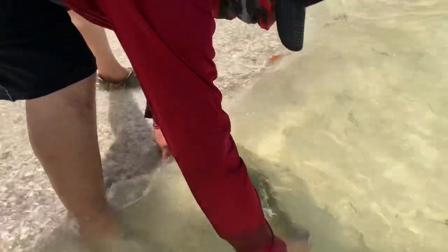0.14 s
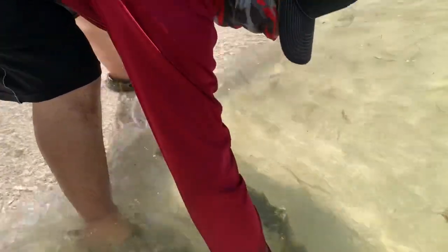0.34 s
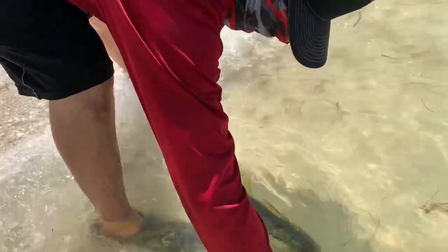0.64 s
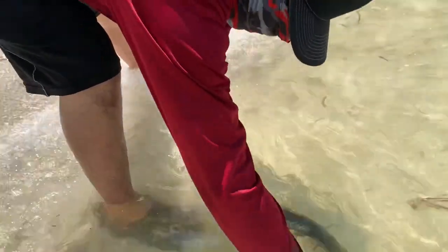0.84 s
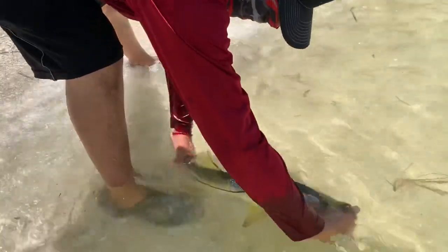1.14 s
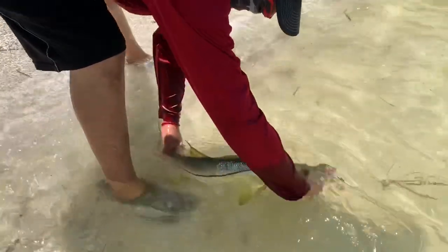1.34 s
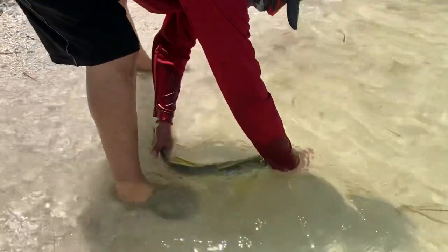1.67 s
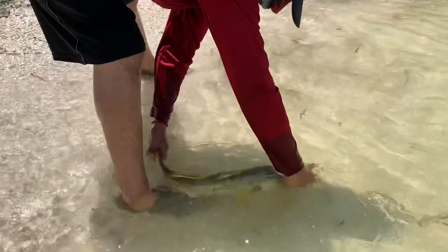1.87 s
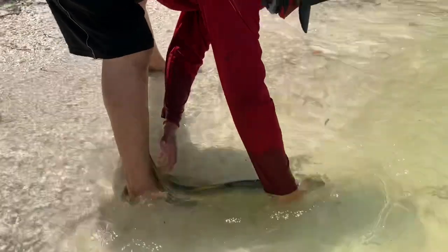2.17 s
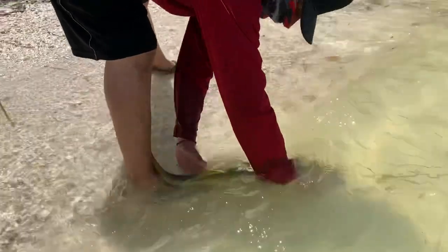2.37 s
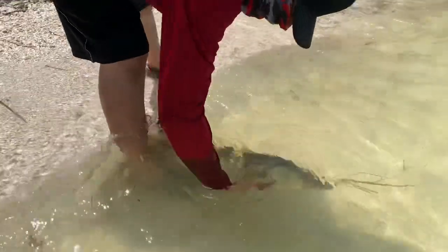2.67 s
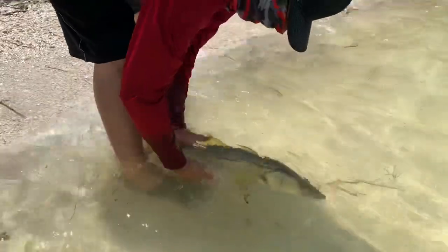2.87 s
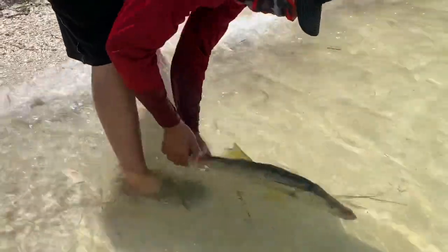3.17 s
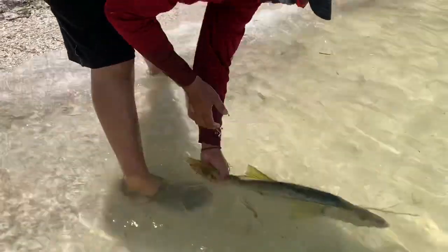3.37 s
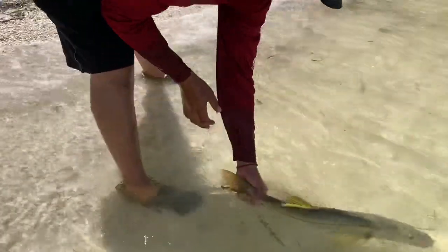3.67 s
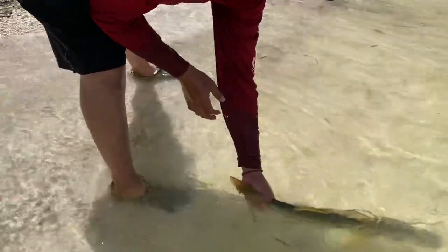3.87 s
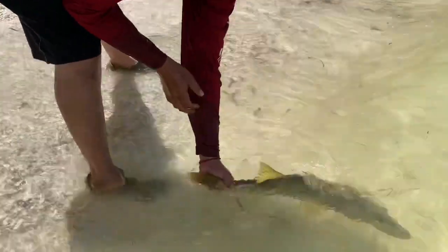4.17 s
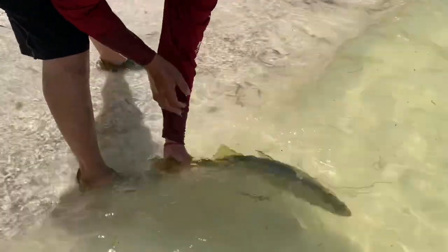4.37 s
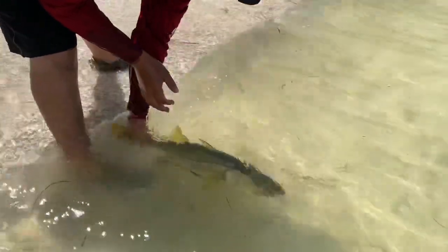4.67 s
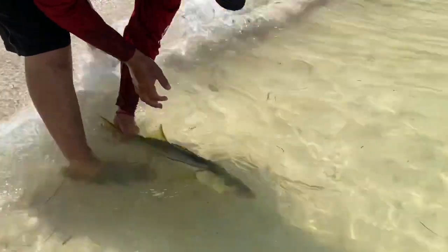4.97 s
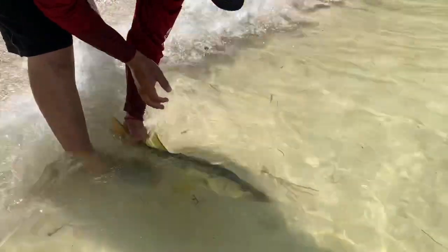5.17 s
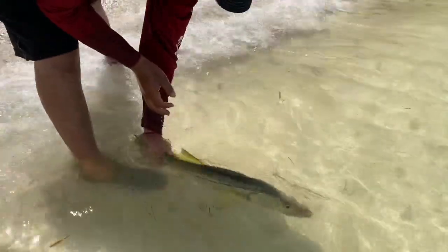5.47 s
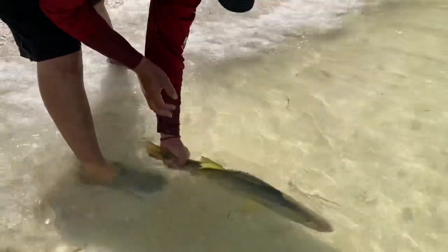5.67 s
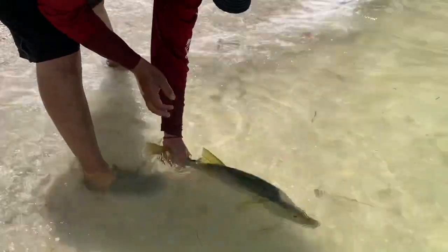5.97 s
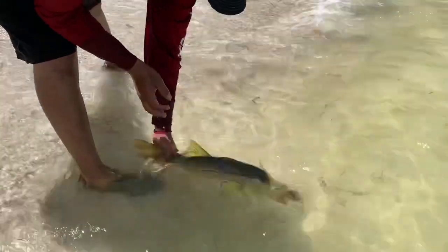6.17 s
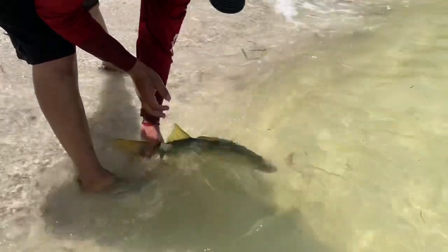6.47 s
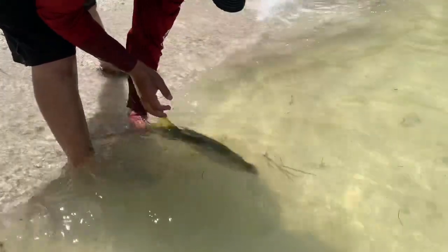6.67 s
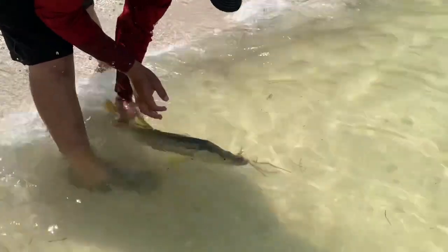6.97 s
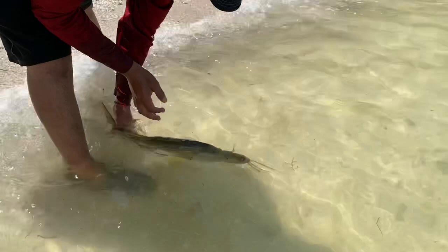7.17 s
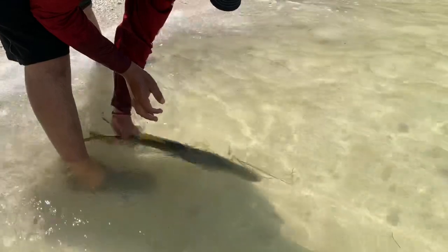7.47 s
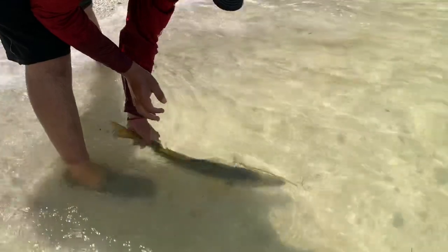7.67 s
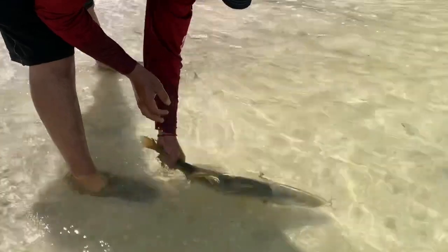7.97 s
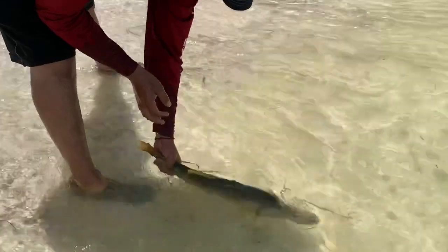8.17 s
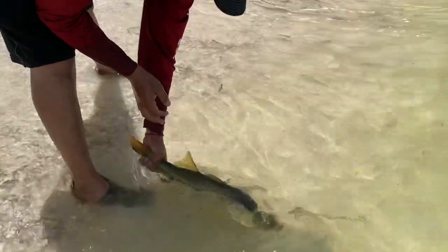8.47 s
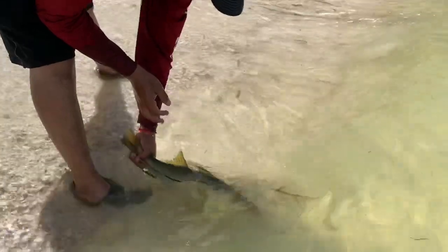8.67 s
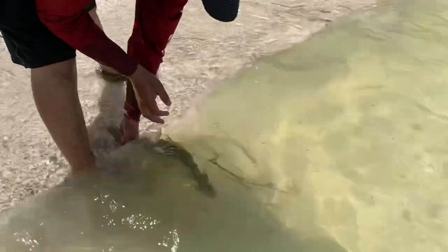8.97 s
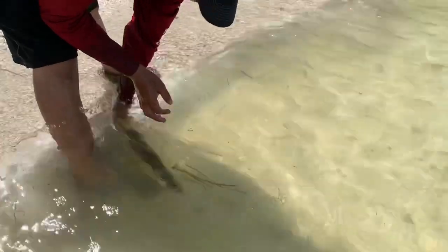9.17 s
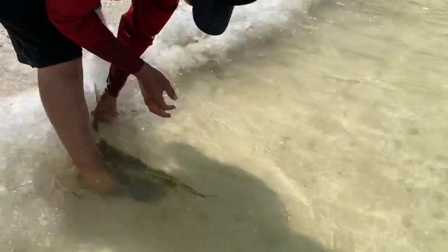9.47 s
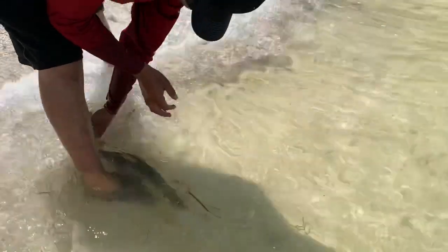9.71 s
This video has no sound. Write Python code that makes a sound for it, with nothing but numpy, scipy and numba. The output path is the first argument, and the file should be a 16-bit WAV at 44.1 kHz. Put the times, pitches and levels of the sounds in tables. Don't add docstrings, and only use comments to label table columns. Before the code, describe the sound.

Outdoors at a sandy beach, a hand-held phone picks up small waves breaking mostly on the left, their foam hissing and fizzing, with smooth distant surf behind. Water slops, slaps and trickles around feet and a fish held in the shallows. Wind gusts thud and rumble on the microphone over a low wavering hum. Washes come and go, strongest near five seconds and after nine.

```python
import sys
import numpy as np
from scipy import signal
from scipy.fft import rfft, irfft
from scipy.io import wavfile
from scipy.ndimage import uniform_filter1d
from numba import njit

SR = 44100
rng = np.random.default_rng(int(sys.argv[2]) if len(sys.argv) > 2 else 0)


def int16_out(signal):
    q = np.round(np.clip(np.atleast_2d(signal).T, -1, 1) * 32767)
    wavfile.write(sys.argv[1], SR, q.astype(np.int16))


def ratio_of_db(decibels):
    return 10 ** (np.asarray(decibels, float) / 20)


N = 433944
TIME = np.arange(N) / SR
FREQ = np.fft.rfftfreq(N, 1 / SR)
COARSE = np.arange(0, N / SR + .01, .01)


@njit
def grains(start, hz, cycles, size, glide):
    out = np.zeros(N)
    for k in range(len(start)):
        tau = cycles[k] * SR / hz[k] / 4
        i0 = int(start[k] * SR)
        phase = 0.
        for i in range(min(int(8 * tau) + 2, N - i0)):
            phase += 2 * np.pi * hz[k] * (1 + glide * i / (4 * tau)) / SR
            out[i0 + i] += size[k] * i / tau * np.exp(1 - i / tau) * np.sin(phase)
    return out


def events(table, cycles, trim_db, glide):
    s, db, hz = np.transpose(table)
    return grains(s, hz, np.full(len(s), cycles), ratio_of_db(db + trim_db), glide)


def trickles(rills):
    s, length, hz, db = np.transpose(rills)[:, :, None]
    when, pitch, big = np.moveaxis(rng.random((len(rills), 150, 3)), 2, 0)
    start = s + length * when
    hz = hz * (1 + 0.14 * (2 * pitch - 1))
    cycles = 13 * (.5 + big)
    return grains(start.ravel(), hz.ravel(), cycles.ravel(), ratio_of_db(db - 18 * big).ravel(), 0.032)


def walk(rate_hz):
    k = int(SR / rate_hz)
    held = np.repeat(rng.standard_normal(N // k + 1), k)
    return 0.867 * uniform_filter1d(uniform_filter1d(held, k), k)[:N]


def foam(count, lo_hz, hi_hz, cycles, spread_db, share):
    when, pitch, big = rng.random((count, 3)).T
    hz = lo_hz * (hi_hz / lo_hz) ** pitch
    size = ratio_of_db(-spread_db * np.log(1.03 - big))
    pops = rfft(grains(when * N / SR, hz, cycles * (.5 + big), size, 0.2063))
    power = uniform_filter1d(np.abs(pops) ** 2, size=8000)
    pops = pops / np.sqrt(power + 1e-9) * np.sqrt(N)
    hiss = rfft(rng.standard_normal(N))
    inside = share * (FREQ > lo_hz) * (FREQ < hi_hz)
    return np.sqrt(inside) * pops + np.sqrt(1 - inside) * hiss


def lag(turns):
    return np.exp(1j * np.pi * turns * np.array([[1], [-1]]))


def ports(shared, turns, likeness):
    alone = rfft(np.array([np.roll(irfft(shared, N), k * N // 3) for k in (1, 2)]))
    return np.sqrt(likeness) * shared * lag(turns) + np.sqrt(1 - likeness) * alone


def surges(table, rise_db_s, fall_db_s, calm_db):
    start, hold, db, *weaker = np.transpose(table)[:, :, None]
    early = np.maximum(start - COARSE, 0)
    late = np.maximum(COARSE - start - hold, 0)
    levels = []
    for k, (fall, calm) in enumerate(zip(fall_db_s, calm_db)):
        each = db - k * sum(weaker) - rise_db_s * early - fall * late
        levels.append(10 * np.log10(ratio_of_db(2 * calm) + np.sum(ratio_of_db(2 * each), axis=0)))
    return levels


def swelling(pair, colour, table, bands_hz, swell_db, flicker_db, flicker_rate, step):
    hz, db = np.transpose(colour)
    octave = np.log2(np.maximum(FREQ, 1))
    pair = pair * ratio_of_db(np.interp(octave, np.log2(hz), db, -200)) * np.sqrt(SR / 2)
    s, *levels = np.transpose(table)
    levels = np.array([c - 10 * np.log10(np.mean(ratio_of_db(2 * c))) for c in levels])
    swell = walk(flicker_rate)
    out = 0
    for centre in np.arange(np.floor(np.log2(hz[0])), np.log2(min(hz[-1], 20000)) + step, step):
        band = irfft(pair * np.clip(1 - np.abs(octave - centre) / step, 0, 1), N)
        weights = [np.interp(centre, np.log2(bands_hz), one) for one in np.eye(len(bands_hz))]
        curve = np.interp(TIME, s, levels.T @ weights)
        out = out + band * ratio_of_db(curve + swell_db * swell + flicker_db * walk(flicker_rate))
    return out


# frequency in Hz, density in dB per Hz.
FAR_COLOUR = [(60, -68.5), (200, -73), (400, -66.5), (560, -70), (740, -76), (950, -68), (1120, -73.5),
              (1300, -69.5), (1800, -75.5), (2300, -79.5), (3000, -84), (8000, -100)]


def far_surf():
    lead_s = 0.00024
    pair = ports(rfft(rng.standard_normal(N)), -lead_s * FREQ, 0.57)
    steady = [(0, 0), (10, 0)]
    return swelling(pair, FAR_COLOUR, steady, [500],
                    swell_db=-1.86, flicker_db=0.0, flicker_rate=1.38, step=0.91)


# time in seconds, pitch in Hz, level in dB.
DRONE = [
    (0, 135.9, -36.5),
    (3.001, 135.6, -40.5),
    (5.6, 121.7, -40),
    (7, 133, -49.5),
    (9.84, 127.6, -43),
]


def drone():
    s, hz, db = np.transpose(DRONE)
    pitch_hz = np.interp(TIME, s, hz) * (1 + 0.049 * walk(20))
    phase = 2 * np.pi * np.cumsum(pitch_hz) / SR
    level_db = np.interp(TIME, s, db) + 2.0 * walk(12)
    return np.sqrt(2) * ratio_of_db(level_db) * np.sin(phase)


# start in seconds, hold in seconds, buffet in dB, rumble weaker by dB.
GUSTS = [(0.05, .07, -31, 16), (0.19, 0.12, -35, -10.5), (0.41, 0.17, -30.5, 5), (0.76, 0.07, -35.5, -8),
         (1.7, 0.018, -31, 6), (1.83, 0.027, -27, -3), (2.33, 0.048, -29, 0), (2.88, 0.038, -34.5, -5.5),
         (3.18, 0.058, -32, 3), (3.5, 0.15, -29, 16), (3.86, 0.016, -33, -4), (4.21, 0.031, -29, 0),
         (4.37, 0.044, -25.5, 16), (4.75, 0.024, -20.5, 24), (5.05, 0.088, -22, 16), (5.64, 0.35, -34.5, 0),
         (6.44, 0.066, -27.5, -3), (6.88, 0.087, -32.5, -7), (7.04, 0.014, -21.5, 15), (7.26, .02, -31, 9),
         (7.42, .02, -29.5, 14), (7.56, 0.014, -26, 8), (7.78, .02, -38, 20), (8.03, .03, -39.5, -16.5),
         (8.19, 0.018, -46, 8), (8.6, 0.079, -29, 18), (9.09, 0.081, -24, 1), (9.26, 0.026, -25.5, -5.5),
         (9.37, .05, -26, 7), (9.57, 0.023, -20, 5)]
# start in seconds, hold in seconds, slosh in dB.
SLOSHES = [(0.16, .02, -34.5), (0.41, 0.085, -28.5), (0.58, .06, -33), (0.76, 0.031, -29.5),
           (1.5, 0.026, -31), (1.7, 0.14, -31.5), (1.87, 0.03, -24), (2.1, 0.094, -29.5),
           (2.28, 0.1, -28.5), (2.9, 0.41, -30), (3.5, .1, -27), (3.66, 0.079, -23.5), (3.85, 0.27, -30.5),
           (4.79, 0.1, -26.5), (5.03, .18, -18), (5.34, 0.68, -33), (5.84, .06, -33), (5.96, 0.15, -26.5),
           (6.77, 0.051, -33), (6.96, 0.027, -28.5), (7.12, 0.025, -25.5), (7.36, .03, -33),
           (7.55, 0.045, -26.5), (7.66, 0.19, -26), (8.0, 0.046, -35), (8.22, 0.091, -37), (9.15, .02, -29),
           (9.26, 0.013, -23.5), (9.37, 0.13, -25), (9.58, 0.12, -22.5)]


def ahead_levels():
    buffet, rumble = surges(GUSTS, rise_db_s=119, fall_db_s=[113, 82], calm_db=[-31, -31.5])
    slosh, = surges(SLOSHES, rise_db_s=124, fall_db_s=[117], calm_db=[-43])
    return np.transpose([COARSE, rumble, buffet, slosh])


# frequency in Hz, likeness 0-1, left minus right in dB, lag in turns.
AHEAD_PORTS = [(30, 0.98, 1, 0), (100, 0.96, -1.5, 0.059), (300, 1, -0.5, 0.035), (600, 0.98, 3.5, 0),
               (1010, 0.87, 3, 0.095), (2900, 0.7, 0.5, 0.54)]
AHEAD_BANDS_HZ = [70, 160, 500]
# frequency in Hz, density in dB per Hz.
AHEAD_COLOUR = [(20, -90), (32, -64), (62, -58), (105, -56), (137, -53.5), (175, -54.5), (215, -54),
                (330, -63.5), (640, -62.5), (780, -67.5), (950, -68), (1150, -73), (1800, -80)]


def wind_and_slosh():
    gurgle = foam(count=3500, lo_hz=50.78, hi_hz=1456.5, cycles=8.94, spread_db=3.0, share=0.51)
    hz, likeness, _, turns = np.transpose(AHEAD_PORTS)
    pair = ports(gurgle, np.interp(FREQ, hz, turns), np.interp(FREQ, hz, likeness))
    return swelling(pair, AHEAD_COLOUR, ahead_levels(), AHEAD_BANDS_HZ,
                    swell_db=1.3, flicker_db=1.8, flicker_rate=10, step=0.46)


def lean():
    hz, _, left_db, _ = np.transpose(AHEAD_PORTS)
    return ratio_of_db(np.interp(FREQ, hz, left_db) * np.array([[.5], [-.5]]))


# time in seconds, peak in dB, pitch in Hz.
THUMPS = [(0.036, -27.5, 134), (1.662, -23.5, 198), (3.719, -22, 140), (4.374, -19.5, 92),
          (4.749, -23, 237), (5.746, -51, 101), (7.408, -17, 131), (7.544, -22, 125), (7.866, -30, 65),
          (8.096, -28, 105), (8.482, -27, 138), (9.078, -23, 160), (9.234, -14.5, 111)]
# time in seconds, peak in dB, pitch in Hz.
SLAPS = [(0.504, -32, 570), (0.602, -40, 443), (1.688, -23, 706), (1.83, -16, 404), (1.889, -18, 600),
         (2.992, -19, 577), (3.86, -26, 563), (4.735, -18, 425), (5.059, -32, 547), (5.804, -22.5, 406),
         (6.769, -20.5, 550), (7.088, -20, 650), (7.259, -29.5, 670), (9.155, -21, 655), (1.43, -28, 619),
         (1.488, -20, 366), (1.942, -22.5, 912), (2.47, -27, 641), (2.508, -28, 610), (3.108, -21, 646),
         (3.228, -23, 655), (3.659, -26, 593), (4.849, -21, 525), (4.976, -24, 610), (5.105, -19, 291),
         (5.117, -14, 607), (6.986, -24, 640), (7.344, -21.5, 490), (7.632, -23, 417), (7.784, -26, 654),
         (9.27, -14, 689), (9.486, -15, 376), (9.647, -16, 608), (9.787, -19, 570)]
# start in seconds, length in seconds, pitch in Hz, peak in dB.
RILLS_AHEAD = [
    (1.95, .42, 3250, -41),
    (4.98, .25, 900, -33),
    (5.55, .25, 560, -37),
    (.52, .2, 1500, -41),
    (6.95, .5, 3300, -44),
]


def splashes_ahead():
    thumps = events(THUMPS, cycles=3.5, trim_db=-0.5, glide=-0.12)
    slaps = events(SLAPS, cycles=5., trim_db=-5.5, glide=.1)
    return thumps + slaps + trickles(RILLS_AHEAD)


# time in seconds, peak in dB, pitch in Hz.
TICKS = [(0.1526, -29, 13500), (0.1895, -38, 10400), (0.2154, -27.5, 10000), (0.2743, -58, 13400),
         (0.3077, -58, 13400), (0.3207, -28.5, 9100), (0.618, -25, 13300), (0.7134, -18, 9750),
         (1.2391, -44.5, 13800), (1.6696, -32, 13700), (2.4887, -49, 13050), (3.1552, -20, 9850),
         (4.346, -27, 11000), (4.5845, -44, 9400), (4.6418, -51, 10500), (5.3148, -18, 13100),
         (5.4286, -28, 10600), (6.1629, -27, 10500), (6.9267, -22, 13000), (6.982, -24, 10700),
         (7.1062, -45, 13200), (8.426, -31, 10300), (8.4886, -35, 12500), (8.6418, -28, 12900),
         (8.8623, -27, 9900), (9.0094, -28, 13300), (9.2579, -16, 13800), (9.644, -14, 12700)]
# time in seconds, peak in dB, pitch in Hz.
DROPS = [(0.155, -27, 2670), (0.814, -31, 2340), (1.1864, -30, 2740), (1.241, -22, 3040),
         (1.4107, -34, 2700), (1.8312, -30, 3720), (2.0715, -38, 3180), (2.4907, -32, 2620),
         (4.1036, -53, 1991), (4.8105, -19.5, 2180), (5.7917, -27, 2900), (5.8064, -54, 1830),
         (5.8924, -34, 1810), (6.5181, -29, 3570), (6.6892, -24, 2800), (8.0686, -59, 1850),
         (8.6048, -37, 2020), (9.2, -18, 4000), (2.8315, -32, 1930), (4.6738, -19.5, 2580),
         (4.8354, -22, 3950), (6.4183, -36, 1850), (6.46, -33, 2230), (6.705, -31, 2700),
         (7.2838, -27, 1980), (8.2611, -28, 1590), (9.0758, -25, 2280), (9.275, -17, 3670),
         (2.209, -32, 2250), (.53, -31, 3900)]
# start in seconds, length in seconds, pitch in Hz, peak in dB.
TRICKLES = [(0.5, .3, 2630, -42.5), (4.5, 0.38, 3600, -31.5), (5.8, .25, 399, -34.5),
            (7.1, 0.46, 2170, -36.5), (2.254, .27, 1200, -34), (1.42, .1, 900, -40),
            (3.598, 0.17, 395, -34), (4.46, .45, 2200, -35), (6.402, 0.096, 2380, -46),
            (6.63, .12, 2780, -42), (6.43, 0.039, 1250, -44), (5.7, 0.054, 3550, -44),
            (2, 0.17, 2900, -38.5), (2.08, .05, 1420, -41), (2.42, .06, 1450, -35.5),
            (2.48, .12, 2500, -44), (0.53, .1, 405, -37), (0.45, .2, 270, -39.5), (.53, 0.23, 1900, -41),
            (1.12, .04, 820, -44), (1.6, 0.037, 900, -42), (8.85, 0.23, 2600, -48), (8.86, .05, 550, -44),
            (9.0, .07, 496, -39), (9.0, 0.068, 3600, -41), (9.14, .04, 650, -34), (9.22, 0.042, 520, -34),
            (4.65, .2, 400, -34), (6.9, .55, 3600, -38), (.55, .18, 1320, -38), (8.9, .17, 5100, -46),
            (9.07, .06, 4500, -37), (4.72, .2, 1430, -37), (5.0, 0.22, 1240, -42)]


def droplets(turns):
    ticks = events(TICKS, cycles=2.6, trim_db=7.0, glide=.05)
    drops = events(DROPS, cycles=12.0, trim_db=-5.0, glide=0.09)
    return irfft(rfft(ticks + drops + trickles(TRICKLES)) * lag(turns), N)


# start in seconds, hold in seconds, surge in dB.
PLUNGES = [(0.42, .1, -42), (0.6, 0.024, -25), (1.49, 0.014, -37), (1.75, 0.13, -54), (2.09, .03, -33.5),
           (2.22, 0.31, -36.5), (2.75, 0.1, -35.5), (2.98, 0.1, -33.5), (3.15, 0.044, -33),
           (3.36, .03, -40), (4.0, .3, -46), (4.55, 0.066, -35.5), (4.74, .15, -24.5), (5.0, 0.19, -27.5),
           (5.38, .03, -51), (5.62, 0.054, -42), (6.0, 0.32, -38.5), (6.98, 0.043, -34), (7.2, 0.19, -31.5),
           (7.48, 0.074, -38.5), (7.8, 0.027, -34), (8.15, 0.29, -43.5), (8.87, 0.02, -42),
           (9.12, 0.37, -25.5), (9.63, 0.03, -25.5), (9.82, 0.044, -33)]
# start in seconds, hold in seconds, wash in dB,
# weaker by dB for each step up to fizz and spray.
FOAM = [(0.0, .02, -38.5, 8), (0.16, 0.033, -43.5, 5), (0.37, 0.12, -31.5, 6), (0.57, 0.11, -29.5, 7),
        (1.25, .1, -45, 4.5), (1.5, .02, -41, 7), (1.82, 0.1, -41, 3.5), (2.05, 0.37, -39, 7),
        (2.6, 0.34, -33.5, 8.5), (2.98, .2, -31.5, 6.5), (3.3, 0.15, -36, 6.5), (3.55, 0.29, -39.5, 4),
        (3.97, 0.069, -51.5, 0.5), (4.52, 0.13, -29, 8), (4.73, 0.15, -26.5, 6), (5.0, 0.21, -35, 2),
        (5.34, 0.025, -44, 8), (5.52, 0.057, -46.5, 2), (5.74, 0.19, -46.5, 2), (5.98, 0.16, -39.5, 3.5),
        (6.45, 0.084, -43, 6.5), (6.79, 0.096, -38.5, 4), (6.93, 0.36, -31, 7), (7.33, 0.28, -34, 8.5),
        (7.72, 0.11, -39, 5), (8.0, 0.14, -47.5, 6), (8.7, .1, -47.5, 7), (8.86, 0.15, -38.5, 5),
        (9.02, 0.05, -30.5, 13), (9.13, 0.4, -23, 7.5), (9.62, 0.18, -26.5, 7.5)]


def wave_levels():
    surge = surges(PLUNGES, rise_db_s=106, fall_db_s=[86], calm_db=[-45])
    wash_fizz_spray = surges(FOAM, rise_db_s=121, fall_db_s=[40, 53, 50], calm_db=[-72, -55.5, -52.5])
    return np.transpose([COARSE, *surge, *wash_fizz_spray])


# frequency in Hz, right port's lag in turns, likeness 0-1.
PORTS = [(0, 0, .97), (700, .19, .82), (950, .22, .85), (1300, .5, .85), (2500, 1.02, .72),
         (3300, 1.5, .55), (4200, 2.0, .55), (5000, 2.5, .42), (6100, 3.0, .38), (7100, 3.4, .3),
         (7500, 3.78, .9), (8000, 3.7, .97), (8350, 3.56, 1), (8900, 3.43, 1), (10000, 3.0, .98),
         (10800, 2.8, 1), (11050, 2.61, 1), (11650, 2.53, 1), (12350, 2.46, 1), (12600, 2.25, 1),
         (13300, 2.01, .97), (14450, 1.6, 1), (15150, 1.47, 1), (22050, -.62, 1)]
WAVE_BANDS_HZ = [800, 2400, 5000, 10000]
# frequency in Hz, density in dB per Hz.
WAVE_COLOUR = [(100, -75), (250, -67.5), (600, -63), (1000, -67.5), (2000, -70.5), (4000, -76.5),
               (8000, -80.5), (12000, -81.5), (14600, -83), (15600, -91)]


def waves():
    hz, turns, likeness = np.transpose(PORTS)
    turns = np.interp(FREQ, hz, turns)
    likeness = np.interp(FREQ, hz, likeness)
    bubbles = foam(count=9000, lo_hz=301.7, hi_hz=7306, cycles=16, spread_db=3.0, share=0.42)
    crackle = foam(count=5000, lo_hz=6900, hi_hz=16000, cycles=3.5, spread_db=2.0, share=0.31)
    surf = ports(np.where(FREQ < 7300, bubbles, crackle), turns, likeness)
    surf = swelling(surf, WAVE_COLOUR, wave_levels(), WAVE_BANDS_HZ,
                    swell_db=1.36, flicker_db=1.5, flicker_rate=16, step=1 / 3)
    return surf + droplets(turns)


def scene():
    echo_s, echo_db, echo_hz = 0.00322, -20.5, 2350
    far = rfft(far_surf())
    near = lean() * rfft(drone() + wind_and_slosh() + splashes_ahead() + waves())
    bounce = ratio_of_db(echo_db) * np.exp(-2j * np.pi * FREQ * echo_s) / (1 + (FREQ / echo_hz) ** 2)
    return irfft((near + far) * (1 + bounce), N)


def roll_off(x):
    return signal.sosfilt(signal.butter(12, 15750, fs=SR, output="sos"), x)


def record(dry):
    bottom_hz, top_hz = 36.3, 15750
    mix = signal.sosfilt(signal.butter(2, bottom_hz, "high", fs=SR, output="sos"), dry)
    mix = signal.sosfilt(signal.ellip(8, .2, 70, top_hz, fs=SR, output="sos"), mix)
    return roll_off(mix)


dry = scene()
out = record(dry)
int16_out(out)
```